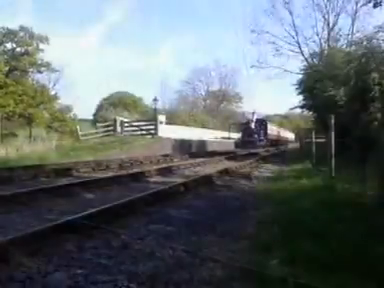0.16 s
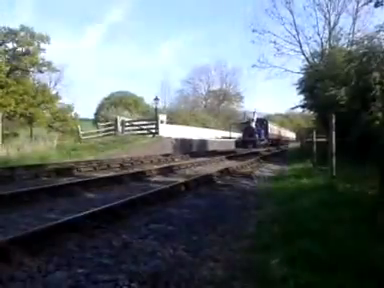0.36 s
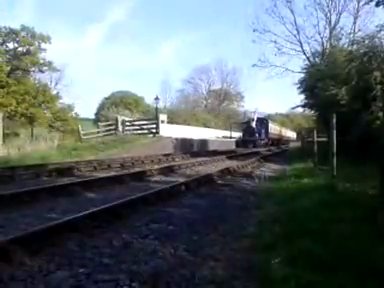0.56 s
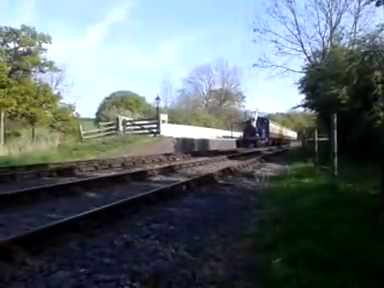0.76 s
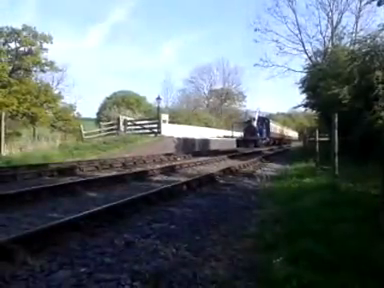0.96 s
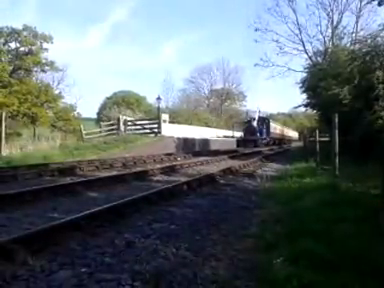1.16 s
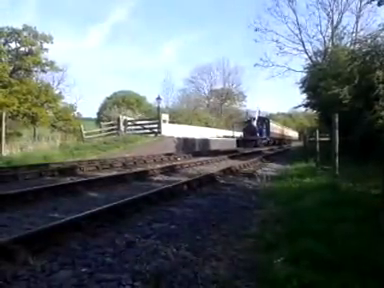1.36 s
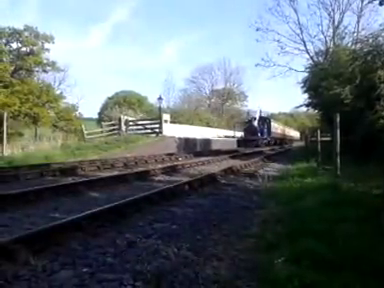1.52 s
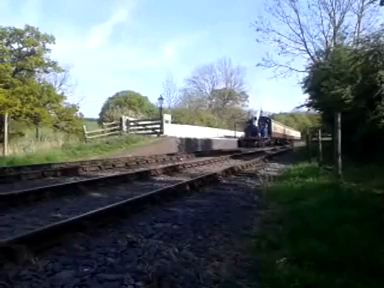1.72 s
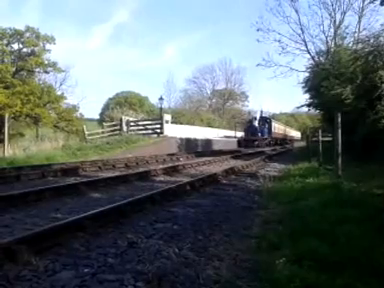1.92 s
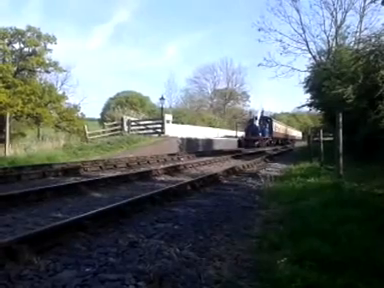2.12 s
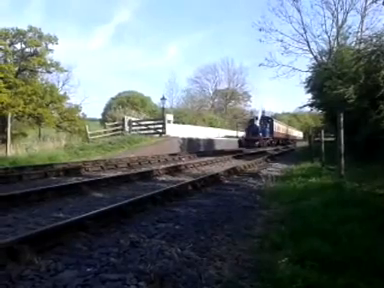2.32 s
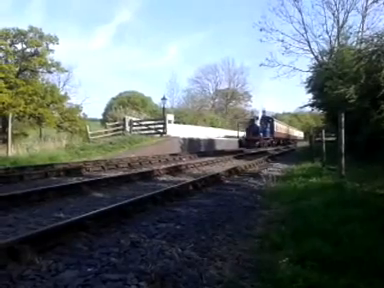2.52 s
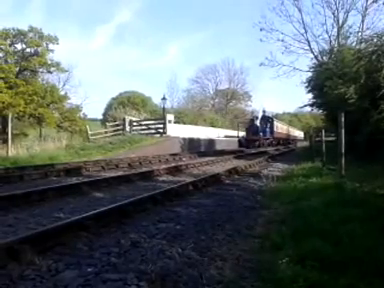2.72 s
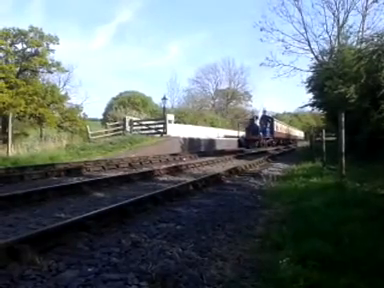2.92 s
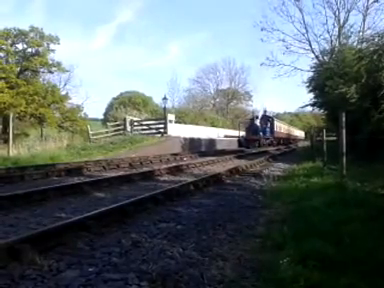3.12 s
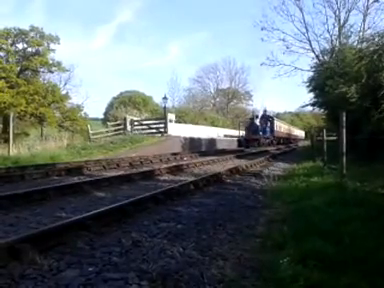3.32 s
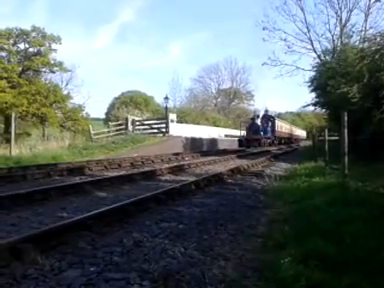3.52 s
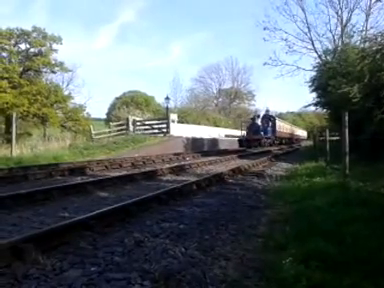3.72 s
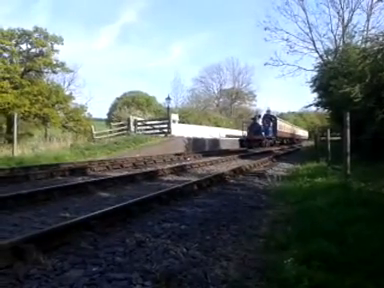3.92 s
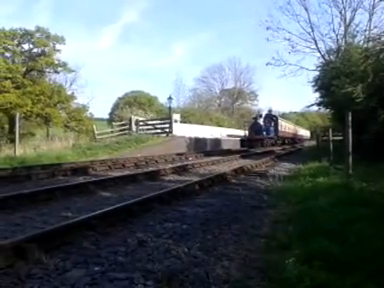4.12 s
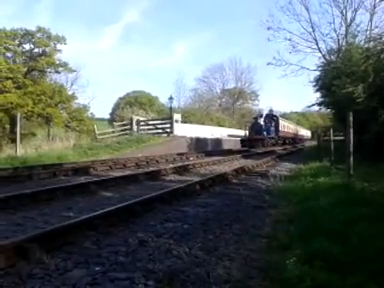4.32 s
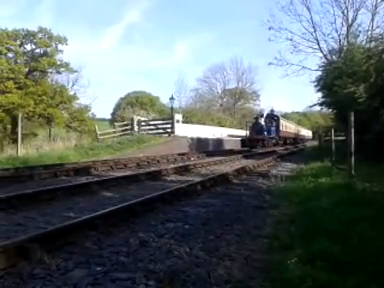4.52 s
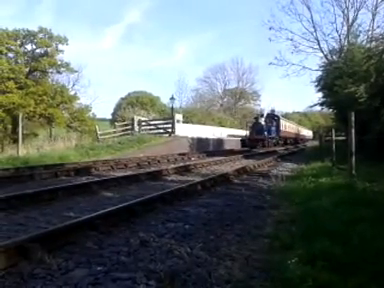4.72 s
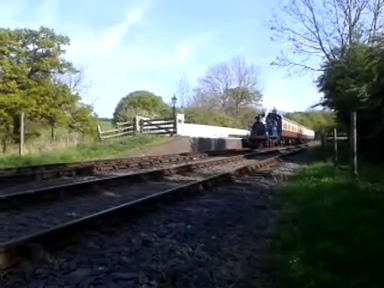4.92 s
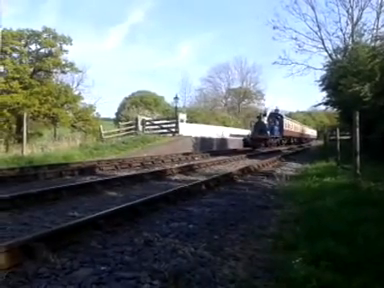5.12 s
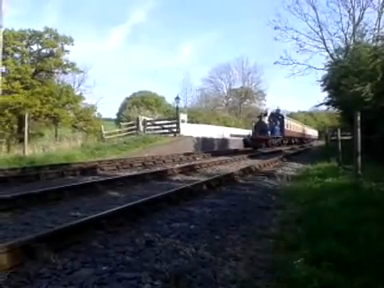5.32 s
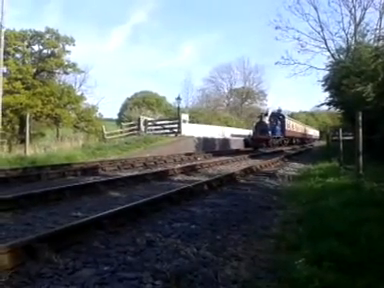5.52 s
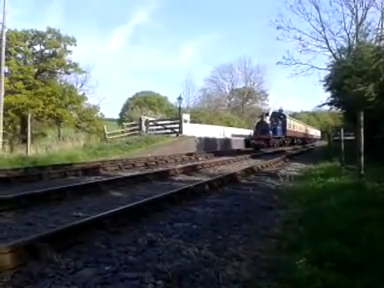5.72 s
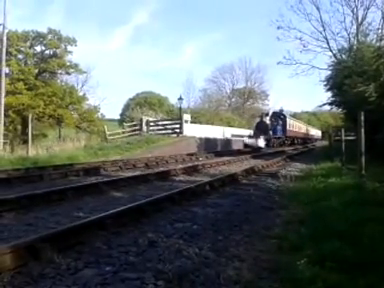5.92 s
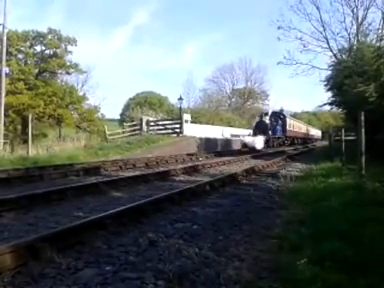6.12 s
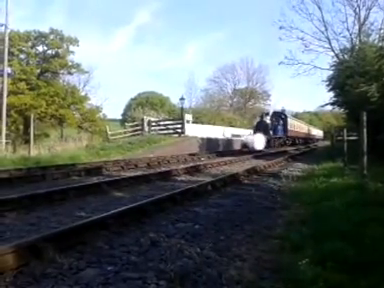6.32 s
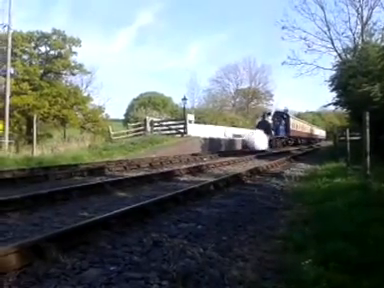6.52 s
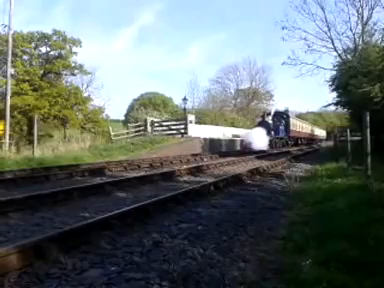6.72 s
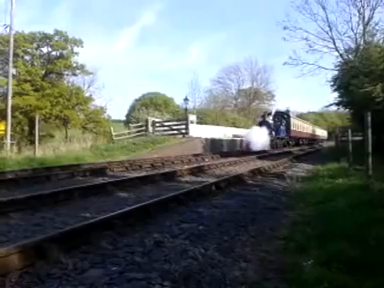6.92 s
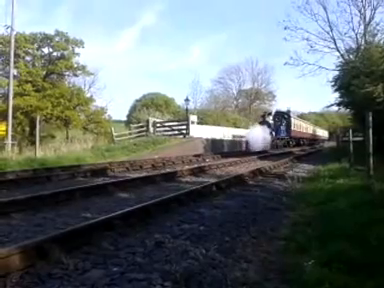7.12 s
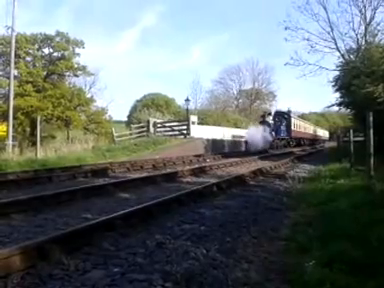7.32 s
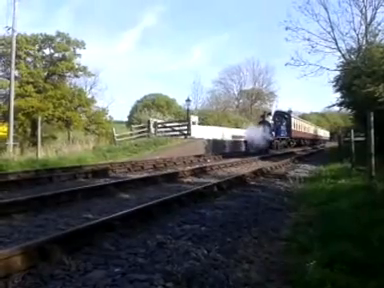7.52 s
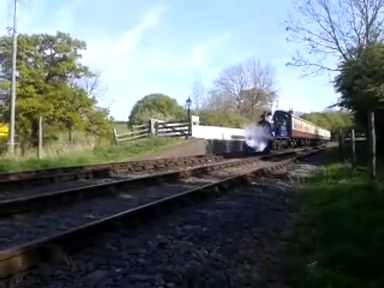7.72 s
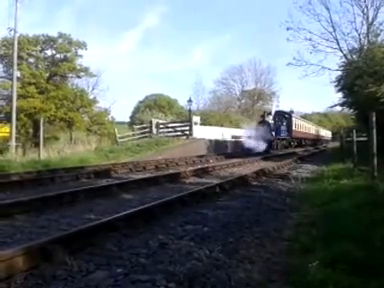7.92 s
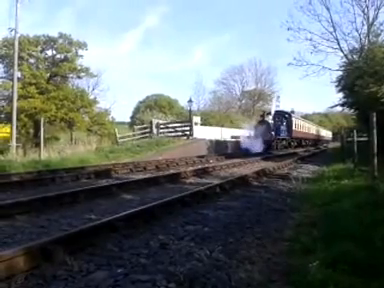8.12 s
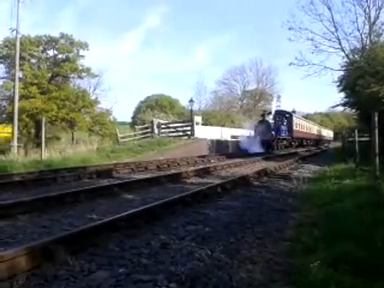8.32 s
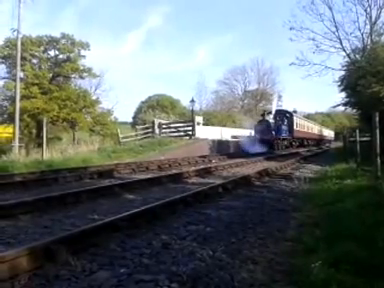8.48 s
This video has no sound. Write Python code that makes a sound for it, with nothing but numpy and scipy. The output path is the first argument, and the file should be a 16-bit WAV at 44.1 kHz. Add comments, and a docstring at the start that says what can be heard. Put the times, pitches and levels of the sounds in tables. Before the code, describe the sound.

Trackside steam engine drawing nearer: breathy exhaust beats speed up through a constant leak hiss, broken late by one long and one short roaring steam jet.

```python
"""A small steam locomotive sets off and draws nearer, heard from the trackside. Its quickening exhaust beats
are puffs of turbulence shaped by chimney and smokebox resonances. Two long blasts from the cylinder drain
cocks overload a cheap microphone; steam leaks throughout with drifting resonances and a few bright spurts.
A hollow hiss fades out over the first 0.3 s, and light air on the microphone rumbles faintly: all are
filtered noise under slow level curves."""
import sys
import numpy as np
from scipy import signal
from scipy.fft import rfft, irfft, next_fast_len
from scipy.io import wavfile
from scipy.ndimage import uniform_filter1d, map_coordinates

SR = 44100
rng = np.random.default_rng(int(sys.argv[2]) if len(sys.argv) > 2 else 0)


def waveform_to_disk(signal):
    """Save audio, clipped to [-1, 1], as 16-bit WAV at the path in sys.argv[1]."""
    frames = np.transpose(np.atleast_2d(signal))
    scaled = np.clip(frames, -1, 1) * 32767
    samples = np.round(scaled).astype(np.int16)
    wavfile.write(sys.argv[1], SR, samples)


N = 377051  # samples

# exhaust puffs
RISE_S, FALL_S = 0.018, 0.033  # time constants of swell and decay, before the shares below are added
RISE_SHARE, FALL_SHARE = 0.049, 0.032  # both grow by this share of the time between beats
BARK_RISE = 1.16  # the bark opens first: its rise over that of the chest
SPRAY_DB, SPRAY_DB_PER_S = -13, 1.25  # against the bark at the start; the nearer the engine, the more of it
# drain cocks
SHUT_DB_PER_S, KNEE_DB = 400, 4  # the valve swings shut; rounding of the corners
BUILD_DB, BUILD_S = 3.5, 0.029  # once open, the jet still gains this much
SAG_DB, SAG_S = 12, 0.37  # the pressure behind the jet drains away
LAST_PUSH_DB, LAST_PUSH_S = 2, 0.11  # and swells again, most as the cock starts to shut
DULL_DB, CLEAR_S = -6, 0.063  # treble of a jet as it starts, wet and dull; time to clear
BRIGHT_DB, DIM_DB, DIM_S = 4.5, 7.5, 0.57  # treble it clears towards, and its loss as the jet weakens
EVEN_SHARE, EVEN_S = 0.33, .25  # as it runs on, this share of a jet loses its resonances
# hollow hiss at the start
HOLLOW_DB, HOLLOW_S = -22.5, 0.3  # level at the start, time to fade out
# converter
INPUT_HZ, SAMPLING_HZ, TOP_HZ = 7330, 16000, 12800  # input band edge, sampling rate, top of the output


def amp(db):
    """Level in decibels to amplitude ratio."""
    return 10 ** (np.asarray(db) / 20)


def unit(x):
    """Normalise to unit root mean square."""
    return x / np.sqrt(np.mean(x ** 2) + 1e-20)


def along(points, hz):
    """Interpolate (frequency [Hz], value) points on a logarithmic frequency axis."""
    f, v = np.transpose(points)
    return np.interp(np.log(hz + 1), np.log(f + 1), v)


def curves(rows):
    """Interpolate linearly in time: one value per sample for each column after the time."""
    s, *cols = np.transpose(rows)
    return [np.interp(np.arange(N) / SR, s, c) for c in cols]


def wobble(rate):
    """Slow random modulation: a spline through random knots, rate of them per second."""
    knots = rng.standard_normal(int(N * rate / SR) + 4)
    return map_coordinates(knots, [np.arange(N) * rate / SR])


def filtered(x, response):
    """Linear filtering: the spectrum is multiplied by a response of frequency."""
    m = next_fast_len(N + 8192)
    return irfft(rfft(x, m) * response(np.fft.rfftfreq(m, 1 / SR)), m)[:N]


def resonant(bands, bed=None):
    """Incoherent resonances: their powers add, over an optional broad bed."""
    def gain(hz):
        power = 0
        for centre, width, db in bands:
            detuning = (hz * hz - centre * centre) / (hz * width + 1e-9)
            power = power + amp(db) ** 2 / (1 + detuning ** 2) ** 2
        bed_power = amp(along(bed, hz)) ** 2 if bed else 0
        return np.sqrt(power + bed_power)
    return gain


def turbulence(patchy_db, window=512, across=4, lasting=10):
    """Turbulent noise: white noise with random gain smoothed over bins (across) and frames (lasting)."""
    z = signal.stft(rng.standard_normal(N), nperseg=window)[2]
    across_bins = uniform_filter1d(rng.standard_normal(z.shape), across, 0)
    field = uniform_filter1d(across_bins, lasting, 1)
    return signal.istft(z * amp(patchy_db * unit(field)), nperseg=window)[1][:N]


def streaky(patchy_db):
    """Multipath interference over ground and hedges, as narrow, long-lived random streaks in noise."""
    return turbulence(patchy_db, window=2048, across=2, lasting=24)


def steam(hiss, level_db, bright_db, pivot_hz):
    """Jet noise changes its spectral balance: the treble moves against the body of the hiss."""
    treble = filtered(hiss, lambda hz: 1 / (1 + (pivot_hz / (hz + 1)) ** 4))
    return amp(level_db) * (hiss - treble + amp(bright_db) * treble)


def exhaust():
    """Pulsed jets excite chimney and smokebox resonances; reverberation from banks and trees prolongs them."""
    # exhaust beats: (time of the peak [s], chest level [dB], bark level [dB])
    beats = [(.395, -26.5, -22), (1.236, -26, -23), (1.941, -27.5, -22.5), (2.587, -22, -19),
             (3.193, -25, -22.5), (3.833, -23, -23), (4.387, -24, -21), (4.915, -21.5, -20),
             (5.415, -23.5, -22), (5.95, -20.5, -17.5), (6.43, -27.5, -24.5), (6.893, -21, -20.5),
             (7.338, -23, -19.5), (7.811, -20.5, -21.5), (8.24, -25.5, -21)]
    # smokebox resonances: (centre [Hz], width [Hz], relative level [dB])
    chest_bands = [(233.6, 23, -15), (413, 70, -2), (536, 260, -1), (738, 142, -3), (875, 110, -6.5)]
    # chimney resonances: (centre [Hz], width [Hz], relative level [dB])
    bark_bands = [(1178, 237, -3), (1450, 280, -13), (1631, 290, -2)]
    # airy top of a beat: (centre [Hz], width [Hz], relative level [dB])
    spray_bands = [(2006, 310, 0), (2470, 250, 4.5), (3120, 680, -3)]
    t, puffs = np.arange(N) / SR, np.zeros((2, N))
    gaps = np.gradient(np.array(beats)[:, 0])
    for (s, chest_db, bark_db), gap in zip(beats, gaps):
        rise = (RISE_S + RISE_SHARE * gap) * np.array([[1], [BARK_RISE]])
        fall = FALL_S + FALL_SHARE * gap
        u = (t - s) / np.where(t < s, rise, fall)
        puffs += amp([[chest_db], [bark_db]]) * np.exp(-np.abs(u) ** 2.3)
    lumps = amp(0.6 * wobble(110))
    chest = unit(filtered(lumps * turbulence(patchy_db=2.9), resonant(chest_bands)))
    bark = unit(filtered(lumps * turbulence(patchy_db=-0.4), resonant(bark_bands)))
    spray = unit(filtered(lumps * turbulence(patchy_db=1.6), resonant(spray_bands)))
    spray = amp(SPRAY_DB + SPRAY_DB_PER_S * t) * spray
    direct = puffs[0] * chest + puffs[1] * (bark + spray)
    # the noise tail decays by 60 dB in 0.53 s
    tail = rng.standard_normal(SR // 2) * amp(-60 * np.arange(SR // 2) / SR / 0.53)
    return direct + amp(-9) * signal.fftconvolve(direct, tail / np.linalg.norm(tail))[:N]


def drain_cocks():
    """Jet noise follows the driving pressure: wet steam bursts out, sags, gets a last push and is shut off."""
    # cock openings: (opens [s], starts to shut [s], burst level [dB], opening slope [dB/s])
    cocks = [(5.84, 6.745, -1.5, 290), (7.587, 7.988, -2.5, 420)]
    # resonances, one list per jet: (centre [Hz], width [Hz], relative level [dB])
    jet_bands = [
        [(1273, 44, -4.5), (1600, 220, 0), (2280, 290, -3), (2486, 220, -7.5), (2830, 72, -7.5),
         (3400, 35, -14), (3775, 210, -3), (5220, 100, -11.5), (5900, 130, -9), (5960, 280, -13)],
        [(1280, 53, -15), (1518, 170, -3), (2024, 150, -4.5), (2480, 190, -1), (3120, 110, -3),
         (3300, 90, -5.5), (3840, 190, -3.5), (5570, 75, -4), (6000, 63, -0.5), (6530, 110, -11.5)],
    ]
    # broad spectrum of both jets: (frequency [Hz], relative level [dB])
    jet_bed = [(200, -52), (500, -31), (800, -21.5), (1100, -14.5), (1400, -13.5), (1900, -7.5), (3000, -6),
               (4500, -12), (6300, -11), (7300, -22)]
    t, out = np.arange(N) / SR, np.zeros(N)
    for (opened, shuts, burst_db, opening), bands in zip(cocks, jet_bands):
        age = np.maximum(t - opened, 0)
        opening_loss = np.logaddexp(0, opening * (opened - t) / KNEE_DB)
        shutting_loss = np.logaddexp(0, SHUT_DB_PER_S * (t - shuts) / KNEE_DB)
        valve_db = -KNEE_DB * (opening_loss + shutting_loss)
        build_db = -BUILD_DB * np.exp(-age / BUILD_S)
        sag_db = -SAG_DB * (1 - np.exp(-age / SAG_S))
        push_db = LAST_PUSH_DB * np.exp(-((t - shuts) / LAST_PUSH_S) ** 2)
        pressure_db = burst_db + build_db + sag_db + push_db
        dimming_db = DIM_DB * np.tanh(age / DIM_S) ** 2
        bright_db = BRIGHT_DB - dimming_db + (DULL_DB - BRIGHT_DB) * np.exp(-age / CLEAR_S)
        source = turbulence(patchy_db=1.7, window=1024, across=3, lasting=12)
        even = EVEN_SHARE * (1 - np.exp(-age / EVEN_S))
        ringing = unit(filtered(source, resonant(bands, jet_bed)))
        plain = unit(filtered(source, resonant([], jet_bed)))
        hiss = (1 - even) * ringing + even * plain
        out += steam(hiss, valve_db + pressure_db + 0.5 * wobble(25), bright_db, pivot_hz=3530)
    return out


def leak():
    """Continuous jet noise: resonances drift by crossfading and the air between makes the level waver."""
    # course of the leak: (time [s], level before brightening [dB], treble gain [dB])
    course = [(0, -30, 7), (.5, -27.5, -4.5), (1.0, -28.5, -6.5), (2.4, -28.5, -3.5), (3.6, -28.5, -4),
              (4.25, -26.8, -6), (4.7, -28, -4), (5.5, -26, -4.5), (6.9, -25.5, 1), (7.15, -24.5, -1),
              (7.5, -26, 1), (8.1, -23.5, -2.5), (8.55, -25, -2)]
    # resonances while the engine is far, nearer and near:
    # (time [s], list of (centre [Hz], width [Hz], relative level [dB]))
    stages = [ (1.5, [(508, 100, -9), (1213, 180, -6), (1810, 200, -2), (1963, 48, 5), (2290, 170, -6),
              (2810, 100, -3.5), (3003, 210, 1.5), (3300, 280, -5), (3900, 98, -4.5), (4530, 74, -9)]),
              (5.0, [(478, 120, -10), (1226, 150, -7.5), (1880, 100, -0.5), (2027, 67, 2.5),
              (2314, 130, -1), (2820, 69, -2), (3020, 95, -4.5), (3165, 190, 0.3), (3930, 190, -8),
              (4640, 68, -8.5)]), (7.5, [(485, 180, -13.5), (1260, 70, -8.5), (1940, 150, -7.5),
              (2020, 150, -1.5), (2290, 260, -3), (2700, 54, -9.5), (2950, 100, -6), (3140, 215, 2.5),
              (3910, 68, -3), (4694, 45, -2)])]
    # broad spectrum of the leak: (frequency [Hz], relative level [dB])
    leak_bed = [(100, -66), (135, -27), (250, -27.5), (310, -29), (400, -11.5), (800, -13.5), (1500, -6.5),
                (2500, -7), (4300, -12), (5500, -11.5), (7000, -18.5)]
    level_db, bright_db = curves(course)
    source = streaky(patchy_db=2.5)
    moments = [s for s, _ in stages]
    hiss = np.zeros(N)
    for share, (_, bands) in zip(np.eye(len(moments)), stages):
        weight = np.interp(np.arange(N) / SR, moments, share)
        hiss += weight * unit(filtered(source, resonant(bands, leak_bed)))
    return steam(hiss, level_db + .5 * wobble(5) + .6 * wobble(15), bright_db, pivot_hz=4200)


def spurts():
    """Brief jets: short bright spits of steam, high-band noise under Gaussian envelopes."""
    # spits: (time of the peak [s], time from peak to 1/e [s], level [dB])
    spits = [(0.507, 0.036, -37), (1.698, .025, -40), (2.07, .03, -37), (2.6, .05, -39.5),
             (3.26, 0.047, -39.5), (4.202, 0.025, -35.5), (4.38, 0.2, -37.5), (4.924, 0.027, -36.5)]
    # spectrum of a spit: (frequency [Hz], relative level [dB])
    spit_bed = [(2500, -28), (3600, 3), (4000, 3), (5200, -2), (6500, 0), (7400, -33)]
    t = np.arange(N) / SR
    swell = sum(amp(db) * np.exp(-((t - s) / half) ** 2) for s, half, db in spits)
    return swell * unit(filtered(turbulence(patchy_db=-2.0), lambda hz: amp(along(spit_bed, hz))))


def hollow_hiss():
    """Resonantly filtered noise under a linear amplitude fade: a hollow hiss heard only at the start."""
    # resonances of the hiss: (centre [Hz], width [Hz], relative level [dB])
    hollow_bands = [(414, 340, -8), (740, 260, -3.5), (1290, 180, -4), (1546, 300, 0.5), (3240, 240, -7.5),
                    (6160, 2100, -19.5)]
    fade = np.clip(1 - np.arange(N) / SR / HOLLOW_S, 0, 1)
    hiss = unit(filtered(turbulence(patchy_db=.8), resonant(hollow_bands)))
    return fade * amp(HOLLOW_DB + .5 * wobble(40)) * hiss


def breeze():
    """Wind noise at a microphone: low-frequency pressure fluctuations, a faint rumble in small gusts."""
    # gusts: (time [s], level [dB])
    gusts = [(0, -53), (.9, -48.5), (1.3, -57), (3.6, -54), (4.4, -52), (5.8, -56.5), (7.2, -53),
             (8.55, -57)]
    # spectrum of the rumble: (frequency [Hz], relative level [dB])
    rumble_bed = [(10, -31.5), (30, 4), (60, -10), (75, -6.5), (92, -56.5), (200, -77)]
    level_db, = curves(gusts)
    lumps = amp(2.5 * wobble(4) + 3 * wobble(10) + 3 * wobble(30))
    rumble = filtered(lumps * rng.standard_normal(N), lambda hz: amp(along(rumble_bed, hz)))
    return amp(level_db) * unit(rumble)


def scene():
    """Superposition of all sources in one channel."""
    return (exhaust() + drain_cocks() + leak() + spurts() + hollow_hiss() + breeze())[None]


def record(dry):
    """A slow converter: band limiting, a faint mirror image above half its rate, overload, small offset."""
    x = filtered(dry[0], lambda hz: 1 / (1 + (hz / INPUT_HZ) ** 240))
    # multiplying by a tone at the sampling rate mirrors the spectrum; a band near 9200 Hz is kept
    mirror = x * 2 * np.cos(2 * np.pi * SAMPLING_HZ * np.arange(N) / SR)
    x = x + amp(-15) * filtered(mirror, lambda hz: np.exp(-((hz - 9200) / 520) ** 6))
    x = x / (1 + np.abs(x / .93) ** 16) ** (1 / 16)  # almost hard clipping
    x = filtered(x, lambda hz: (hz < TOP_HZ) / (1 + (hz / 10300) ** 6))
    return np.clip(x + 0.0036, -1, 1)[None]


dry = scene()
out = record(dry)
waveform_to_disk(out)
```